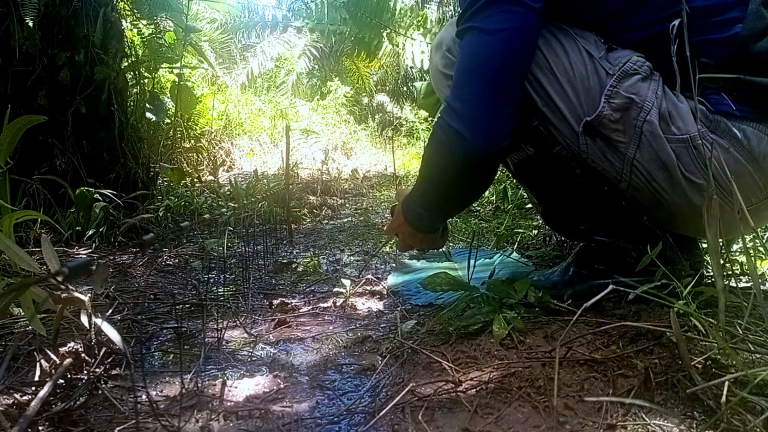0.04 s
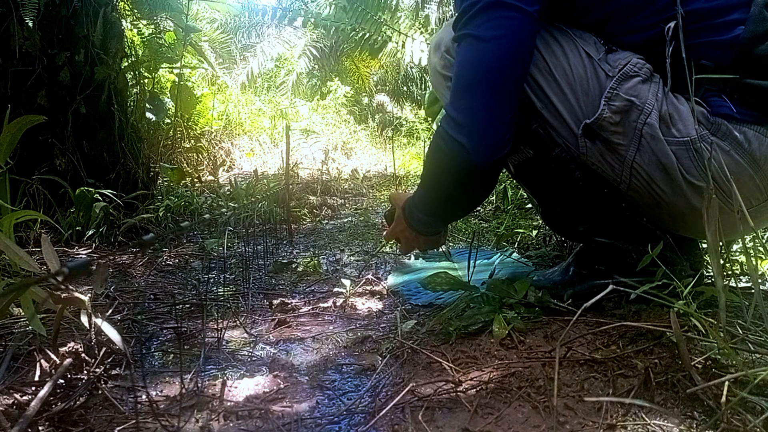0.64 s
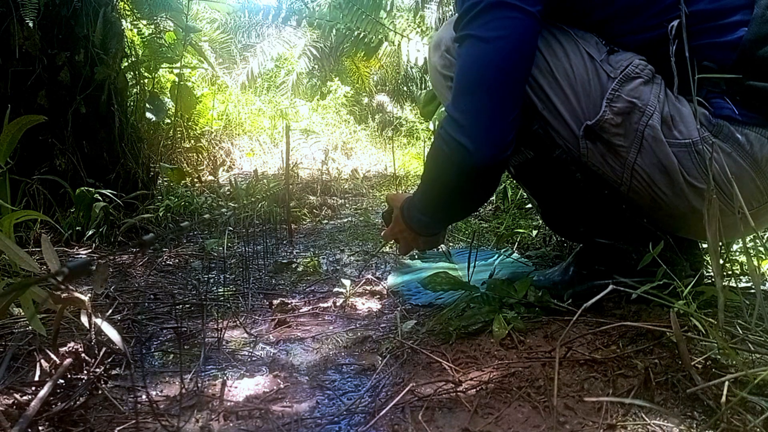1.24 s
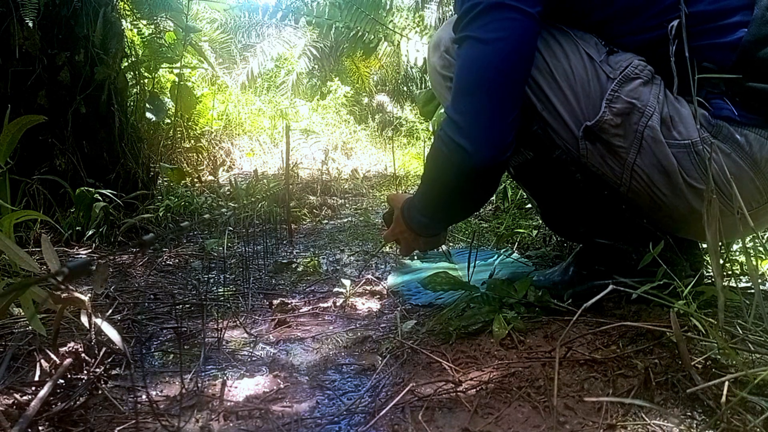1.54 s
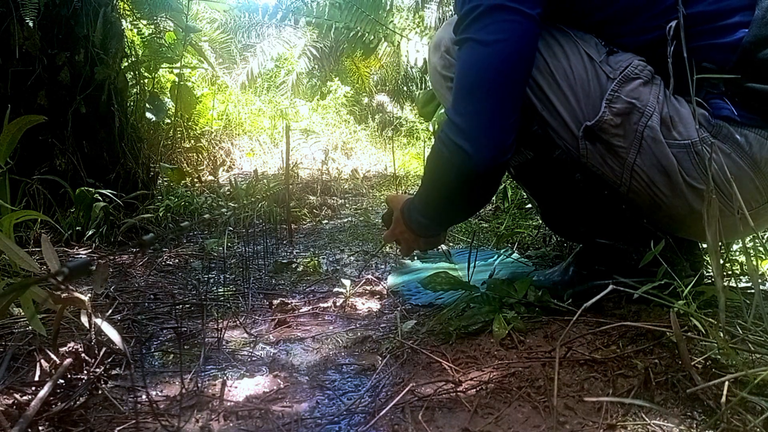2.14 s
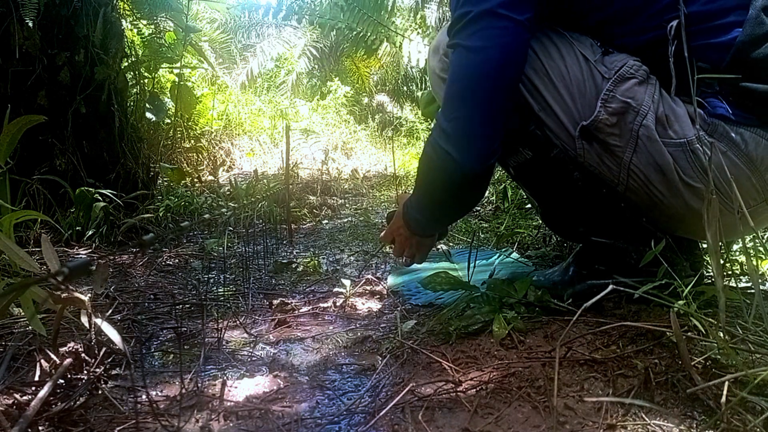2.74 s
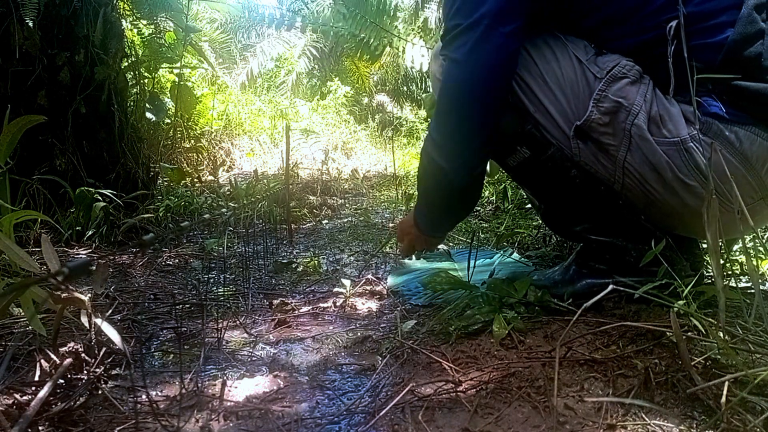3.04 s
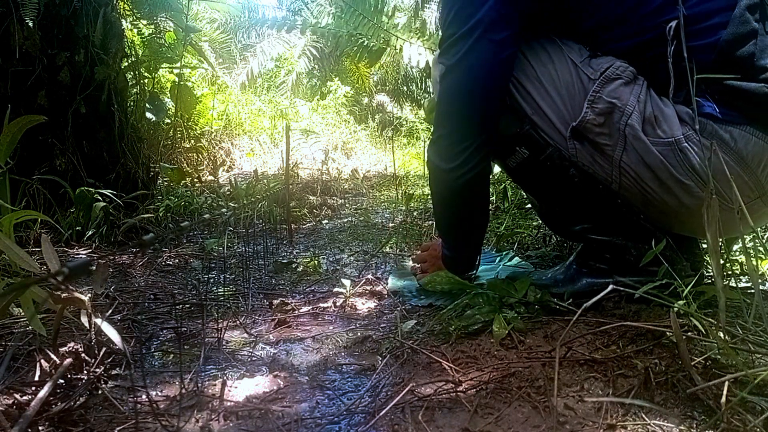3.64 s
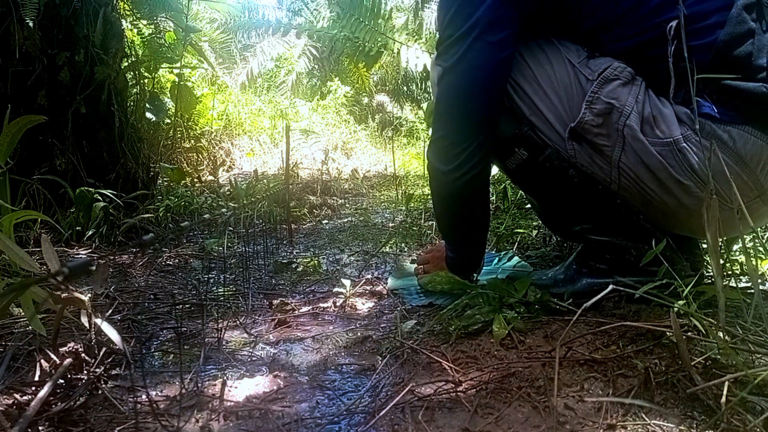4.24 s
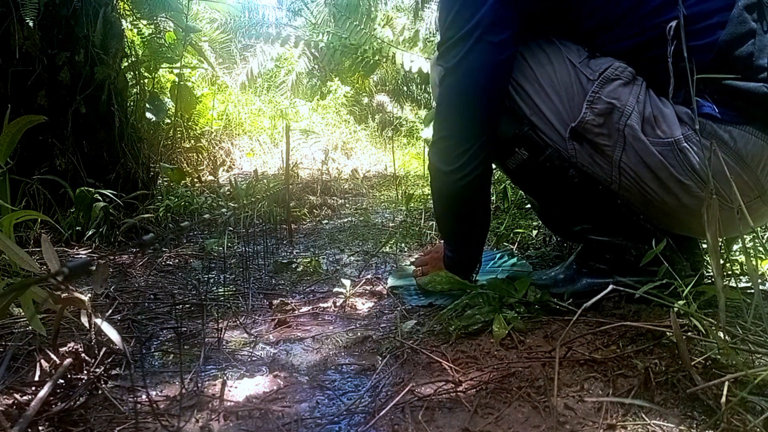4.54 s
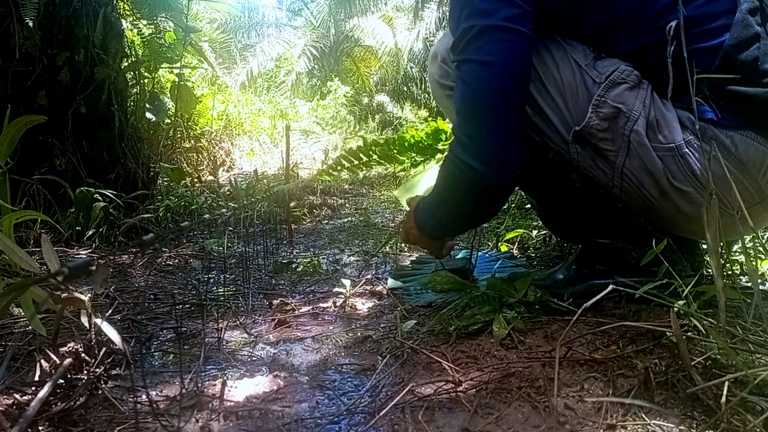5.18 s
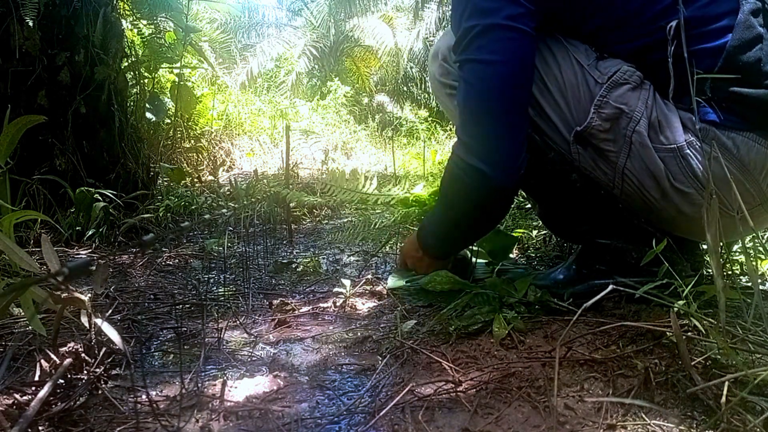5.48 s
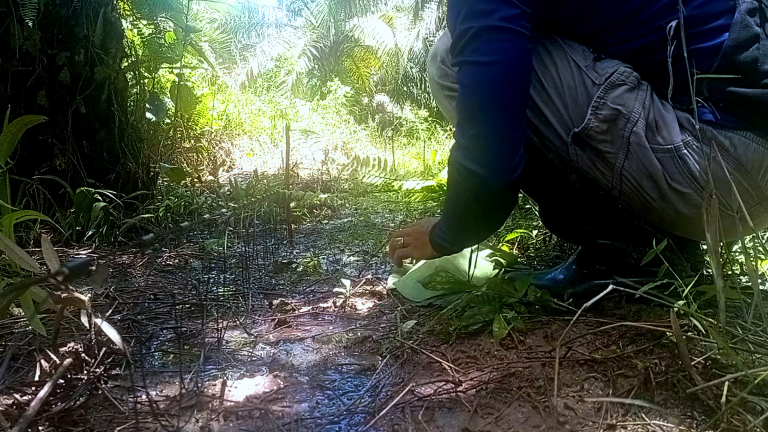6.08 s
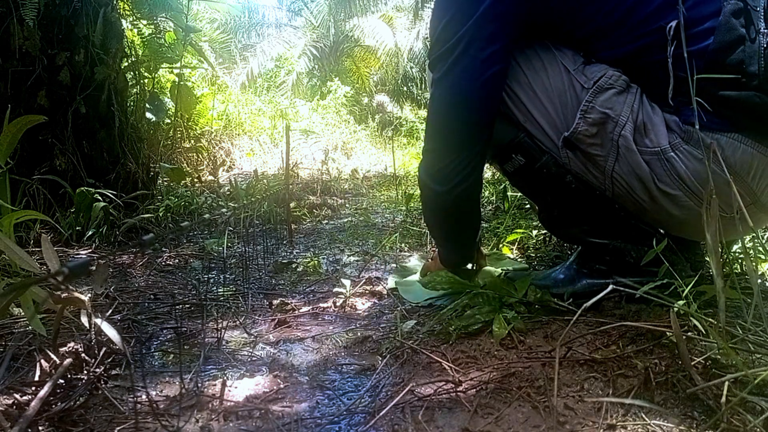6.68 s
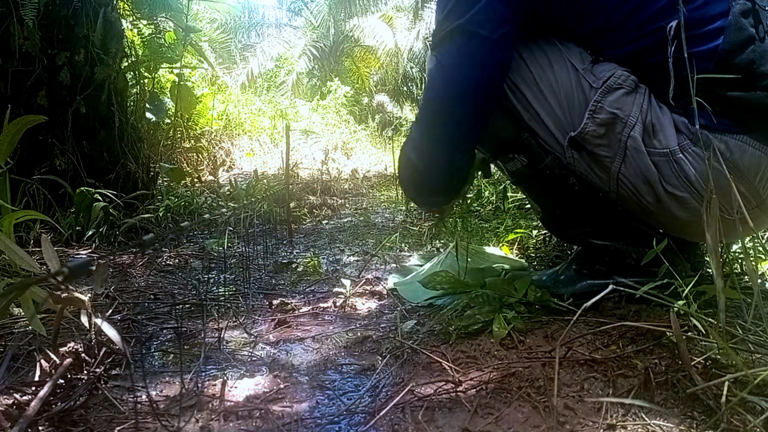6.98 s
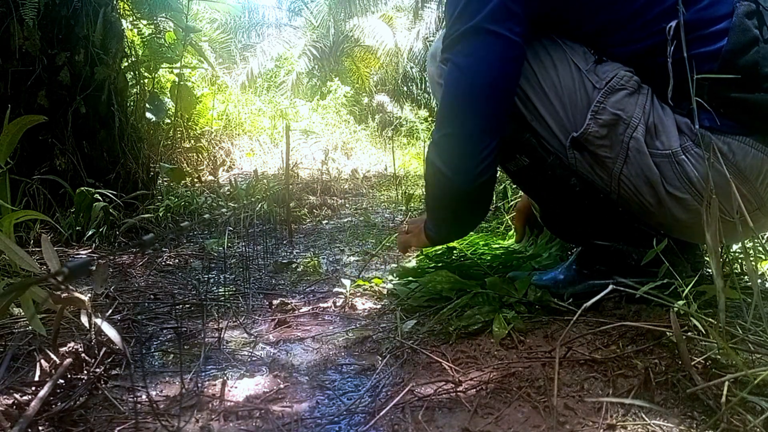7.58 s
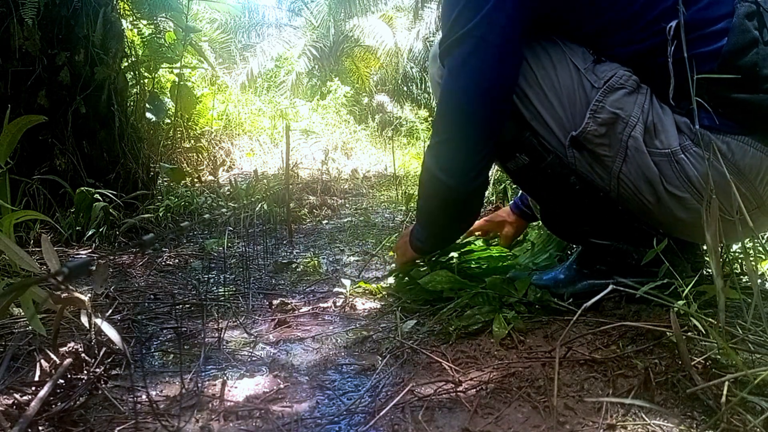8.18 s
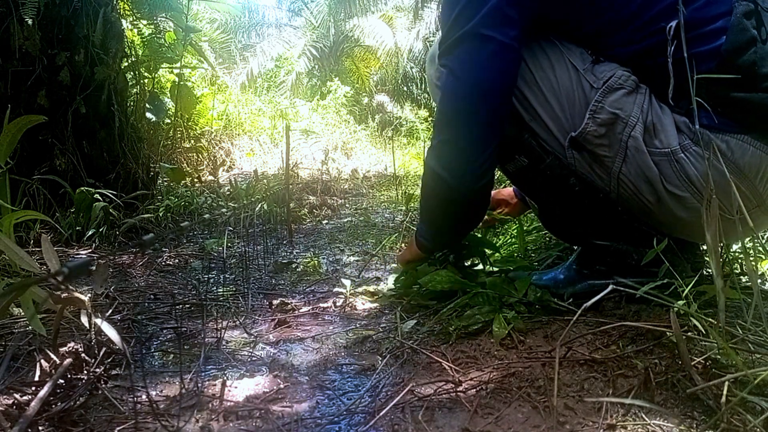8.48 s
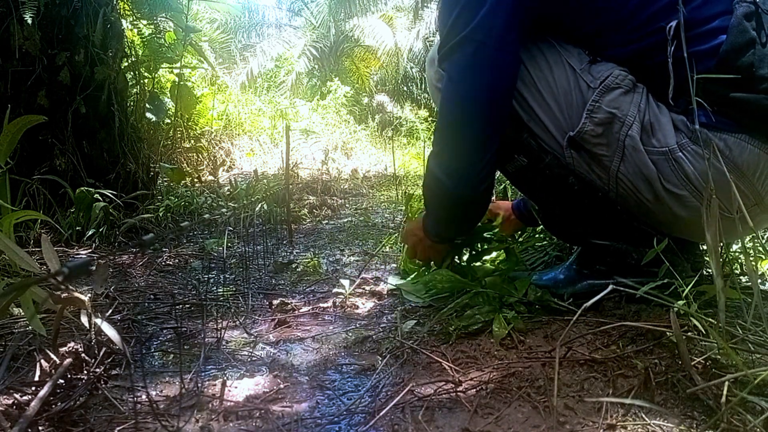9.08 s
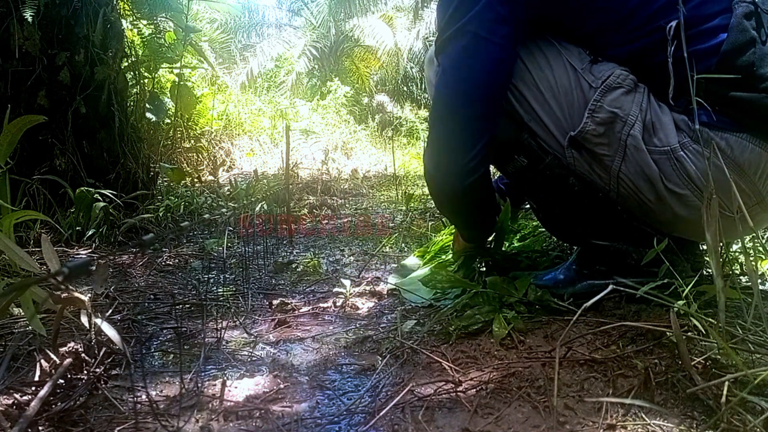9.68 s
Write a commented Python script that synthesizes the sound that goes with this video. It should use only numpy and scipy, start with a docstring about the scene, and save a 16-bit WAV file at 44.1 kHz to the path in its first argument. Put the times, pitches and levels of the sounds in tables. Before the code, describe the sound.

A waterhen calls about twice a second in a wet plantation, each croak breaking into a hoot, over a constant, shimmering cicada drone. Two light wooden taps and a faint distant bird are heard near the start. Someone near the microphone snaps six stems with bright cracks, shifts softly, then presses down rustling fronds in repeated strokes while the calling carries on almost to the end.

```python
"""A wet plantation, with cicadas droning without pause and the trunks echoing.
A waterhen calls nineteen times: the two voices of its syrinx beat in a hoarse croak, then leap
and lock an octave apart in a loud hoot. Far off, a second bird answers faintly.
Close to the microphone wood is tapped twice; someone crouching snaps a few stems, shifts,
and then spreads rustling leaves on the ground."""
import sys
import numpy as np
from scipy import signal
from scipy.fft import rfft, irfft, next_fast_len
from scipy.io import wavfile
from scipy.ndimage import uniform_filter1d, map_coordinates

SR = 44100
rng = np.random.default_rng(int(sys.argv[2]) if len(sys.argv) > 2 else 0)


def store_wav(level_fs):
    """Save 16-bit WAV to argv[1]."""
    pcm = np.round(np.clip(np.atleast_2d(level_fs), -1, 1) * 32767)
    wavfile.write(sys.argv[1], SR, pcm.T.astype(np.int16))


N = 433062

USUAL_NOTE_S, LEAP_AT_S = 0.11, 0.049  # a usual waterhen note, and the middle of its leap
# Spectrum of bending leaves: frequency_hz, gain_db
CRINKLE_SPECTRUM = [(2000, -33), (2700, -16.5), (3200, -10), (3800, -1), (4250, 4.5), (4800, -13),
                    (5600, -10), (6500, -27.5), (13000, -42.5)]


def amp(db):
    """Decibels to gain."""
    return 10 ** (np.asarray(db) / 20)


def unit(x):
    """Scale to rms 1."""
    return x / np.sqrt(np.mean(np.abs(x) ** 2) + 1e-20)


def along(points, hz):
    """Read (frequency_hz, value) points on a log frequency axis."""
    knots_hz, values = np.transpose(points)
    return np.interp(np.log(hz + 1), np.log(knots_hz + 1), values)


def curves(rows, t):
    """Each column after the time, read at the times t."""
    times, *columns = np.transpose(rows)
    return [np.interp(t, times, column) for column in columns]


def step(t, at, width):
    """A smooth rise from 0 to 1 around a moment."""
    return .5 + .5 * np.tanh((t - at) / (2 * width))


def bump(t, at, width):
    """A bell of height 1 around a moment."""
    return np.exp(-((t - at) / width) ** 2)


def gate(t, length, attack_s, release_db_per_s):
    """Rise, hold until length, then die away."""
    return np.clip(t / attack_s, 0, 1) * amp(-release_db_per_s * np.maximum(t - length, 0))


def wobble(rate, size=N):
    """A smooth random curve, rate knots a second."""
    knots = rng.standard_normal(int(size * rate / SR) + 4)
    return map_coordinates(knots, [np.arange(size) * rate / SR])


def coloured(x, spectrum):
    """Filter x by (frequency_hz, gain_db) points."""
    size = next_fast_len(len(x) + 8192)
    gain = amp(along(spectrum, np.fft.rfftfreq(size, 1 / SR)))
    return irfft(rfft(x, size) * gain, size)[:len(x)]


def noise(spectrum, size=N):
    """Coloured noise of rms 1."""
    return unit(coloured(rng.standard_normal(size), spectrum))


def add(track, start_s, sound):
    """Mix a sound into a track."""
    i = max(round(start_s * SR), 0)
    track[i:i + len(sound)] += sound[:len(track) - i]


def grove(x, wet_db, build_s=0.0015):
    """x with a fresh diffuse echo from the trunks."""
    # Decay among the trunks: frequency_hz, t60_s
    decay = [(200, 0.3), (600, 0.14), (1100, 0.35), (1700, 0.31), (2500, 0.13), (3400, 0.37), (4500, 0.26),
             (9000, 0.18)]
    hz, t, bands = signal.stft(rng.standard_normal(SR // 2), SR, nperseg=256)
    tail = signal.istft(bands * amp(-60 * t / along(decay, hz)[:, None]), SR, nperseg=256)[1]
    tail *= 1 - bump(np.arange(len(tail)) / SR, 0, build_s)
    echo = signal.fftconvolve(x, tail)
    return np.pad(x, (0, len(tail) - 1)) + amp(wet_db) * echo * np.linalg.norm(x) / np.linalg.norm(echo)


def air():
    """Faint moving air all around."""
    # Spectrum of the air: frequency_hz, gain_db
    spectrum = [(25, -15.5), (120, 4), (300, 0.5), (1000, -7.5), (2000, -15.5), (5000, -21), (9000, -6)]
    return amp(-81.5) * noise(spectrum)


def insects():
    """Many cicadas merge into a shimmering band, with thin crickets below it."""
    # Spectra of the cicadas' drone, their top sizzle and the crickets: frequency_hz, gain_db
    drone_spectrum = [(4500, -59.5), (6000, -39.5), (6530, -16), (6920, -5), (7350, 1), (7650, -2.5),
                      (7940, -6), (8290, -15.5), (9230, -40.5), (9600, -41), (12400, -77.5)]
    sizzle_spectrum = [(9500, -28.5), (9850, -6), (10200, -23.5), (11300, -44.5), (12500, -34),
                       (13700, -13.5), (14300, -3), (14900, 0), (15100, 7), (15450, 13), (15600, -44)]
    cricket_spectrum = [(4800, -16), (5100, 5), (5500, 15), (5900, 6), (6400, -42.5)]
    drone = amp(-41 + 0.14 * wobble(45) + 0.23 * wobble(13)) * noise(drone_spectrum)
    sizzle_db = np.interp(np.arange(N) / SR, [0, 6, 9.8], [-56.3, -60, -59.5])
    sizzle = amp(sizzle_db + 0.65 * wobble(140)) * noise(sizzle_spectrum)
    crickets = amp(-72 + 3.5 * wobble(15)) * noise(cricket_spectrum)
    return drone + sizzle + crickets


def taps():
    """Two light knocks ring dry wood, close by."""
    # Knocks: start_s, level_db
    knocks = [(0.231, -50.5), (.4565, -46)]
    # Modes of the wood: pitch_hz, gain_db, t60_s
    modes = [(944, 4, 0.029), (1093, -4, .03), (1820, 0, 0.027), (2230, -4.5, 0.082), (3300, -14, 0.057),
             (3750, -10, .03), (4230, 2, 0.026)]
    out = np.zeros(N)
    t = np.arange(SR // 8) / SR
    for start_s, level_db in knocks:
        ring = np.zeros(len(t))
        for hz, gain_db, t60 in modes:
            decay = amp(gain_db + rng.normal(0, 0.48) - 60 * t / t60)
            ring += decay * np.sin(2 * np.pi * hz * t + wobble(270, len(t)))
        attack = 1 - np.exp(-t / 0.0018)
        add(out, start_s, grove(amp(level_db) * ring * attack, wet_db=-19))
    return out


def far_bird():
    """Short wavering hoots from far off among the trunks."""
    # Answering hoots: start_s, length_s, pitch_hz, level_db
    hoots = [(0.944, 0.019, 1114, -46), (1, 0.12, 816, -67), (1.132, 0.047, 900, -52),
             (1.821, 0.028, 903, -53.5), (1.841, .04, 1026, -47), (2.391, 0.11, 903, -49),
             (3.287, 0.053, 923, -55)]
    out = np.zeros(N)
    t = np.arange(SR // 5) / SR
    for start_s, length, hz, level_db in hoots:
        tone = np.sin(2 * np.pi * hz * t + 0.64 * wobble(180, len(t)))
        arch = np.sin(np.pi * np.minimum(t / length, 1))
        add(out, start_s, grove(amp(level_db) * tone * arch, wet_db=-7))
    return out


def low_voice(age):
    """The syrinx's second voice: its pitch over the main pitch, its gain and its sidebands' gain."""
    croak_ratio, hoot_ratio, attack_s = .32, .5, 0.0042
    ratio = croak_ratio + (hoot_ratio - croak_ratio) * step(age, .03, .005)
    # It swells in the croak and again at the break, over a floor that dies in the hoot.
    gain = amp(-8.5) * bump(age, 0.017, .009) + amp(-8) * bump(age, 0.047, 0.0074)
    gain += amp(-26) * gate(age, LEAP_AT_S, attack_s, release_db_per_s=598)
    # The sidebands flare as the leap ends and stay weaker afterwards.
    flare = amp(-10.5) * bump(age, LEAP_AT_S + 0.0058, 0.0064)
    sidebands = amp(-19.5 - 10.5 * step(age, LEAP_AT_S, 0.0043)) + flare
    return ratio, gain, sidebands * np.minimum(age / attack_s, 1)


def near_reflection(held, sounding, strength=0.77, beat_hz=52):
    """Complex gain: a reflection slightly off the gliding pitch beats nulls into the held hoot."""
    size = len(held)
    slip = 2 * np.pi * np.cumsum(held * beat_hz * np.exp(.35 * wobble(40, size))) / SR
    depth = np.clip(strength + 0.19 * wobble(31, size), 0, 1.3) * held
    gain = 1 + depth * np.exp(1j * slip * rng.choice([-1, 1]))
    gain /= (1 + np.abs(gain) ** 4) ** (1 / 4)  # flatten the peaks
    return gain / np.sqrt(np.mean(np.abs(gain[sounding]) ** 2))


def beak_rasp(t, main_phase, low_phase, croak, held):
    """Overtones of the main voice, plus beak resonances rung by uneven pulses of the low voice."""
    # Overtones: pitch_multiple, croak_db, hoot_db
    overtones = [(2, -28, -34.5), (2.5, -65, -34.5), (3, -76, -35), (4, -56, -31), (4.5, -53, -34.5)]
    # Beak resonances: centre_hz, width_hz, croak_db, hoot_db
    resonances = [(3536, 220, -73.5, -33.5), (4420, 220, -20, -38)]
    size = len(t)
    rasp = np.zeros(size)
    for multiple, croak_db, hoot_db in overtones:
        gain = (amp(croak_db) * croak + amp(hoot_db) * held) * amp(4.5 * wobble(90, size))
        rasp += gain * np.sin(multiple * main_phase + 0.39 * wobble(150, size))
    pulses = 1 + .5 * np.cos(low_phase)
    for centre_hz, width_hz, croak_db, hoot_db in resonances:
        drive = pulses * (wobble(width_hz, size) + 1j * wobble(width_hz, size)) / np.sqrt(2)
        hz = centre_hz * (1 + 0.017 * rng.standard_normal())  # the beak opens differently each note
        ring = np.real(drive * np.exp(2j * np.pi * hz * t))
        rasp += amp(croak_db + (hoot_db - croak_db) * held) * ring * (1 - np.exp(-t / .008))
    return rasp


def note(length, croak_hz, croak_db, hoot_hz, hoot_db, hoarse_db):
    """Two voices of the syrinx beat hoarsely, then lock an octave apart in the hoot."""
    # The throat, which cuts deep bass and rings at the upper sideband: frequency_hz, gain_db
    throat = [(120, -46.5), (180, -15.5), (240, -1.5), (1300, 1.5), (1560, 5.5), (1800, -8.5), (2100, -15),
              (3000, -27.5)]
    # Colour of the beak: frequency_hz, gain_db
    beak = [(1500, 2.5), (1800, -0.5), (2080, -4), (2300, -12), (2550, 4), (2800, -15), (3500, -4),
            (3950, -28.5), (4400, 1), (5100, -10.5), (6000, -22.5)]
    overshoot, settle_s, sag_hz_per_s = .09, .014, 220
    croak_jitter, hoot_jitter = 0.038, 0.009
    size = SR // 4
    t = np.arange(size) / SR
    age = t * np.sqrt(USUAL_NOTE_S / length)  # a longer note unfolds more slowly
    leap = step(age, LEAP_AT_S, 0.0043) * (1 + overshoot * bump(age, LEAP_AT_S + settle_s, settle_s))
    croak = 1 - np.clip(leap, 0, 1)
    held = np.clip((age - .058) / .016, 0, 1)

    hz = croak_hz + (hoot_hz - croak_hz) * leap - sag_hz_per_s * np.maximum(age - LEAP_AT_S, 0)
    hz *= 1 + (hoot_jitter + (croak_jitter - hoot_jitter) * croak) * wobble(170, size)
    ratio, low_gain, sideband_gain = low_voice(age)
    main_phase = 2 * np.pi * np.cumsum(hz) / SR
    low_phase = 2 * np.pi * np.cumsum(hz * ratio * (1 + 0.099 * croak * wobble(200, size))) / SR
    tone = np.real(near_reflection(held, t < length) * np.exp(1j * main_phase))
    tone *= amp(2.2 * croak * wobble(260, size))  # the croak flutters
    sidebands = np.sin(main_phase + low_phase) + 0.39 * croak * np.sin(main_phase - low_phase)
    sidebands *= sideband_gain * amp(0.36 * hoarse_db + 0.67 * wobble(150, size))
    hoarse = low_gain * amp(hoarse_db) * np.sin(low_phase) + sidebands
    rasp = amp(0.77 + 1.29 * hoarse_db) * beak_rasp(t, main_phase, low_phase, croak, held)

    # A burst opens the note, the voice weakens as it leaps, then the hoot bursts out.
    effort_db = 10.5 * np.exp(-age / 0.0027) - 4.5 * bump(age, 0.047, 0.0038)
    level_db = croak_db + (hoot_db - croak_db) * step(age, 0.056, 0.0014)
    release_db = 450 * np.maximum(t - length + 0.01, 0)
    attack = 1 - bump(t, 0, .0017)
    envelope = np.sqrt(2) * amp(level_db + effort_db - release_db) * attack
    voice = grove(coloured(envelope * (tone + hoarse), throat), wet_db=-16)
    return voice + grove(coloured(envelope * rasp, beak), wet_db=-0.5)


def waterhen():
    """The nearer bird's string of notes: a hoarser note is also longer and raspier."""
    # Notes: start_s, hoot_db, hoarseness_db
    notes = [(1.168, -23, .5), (1.591, -23, 1), (2.027, -24, -1.5), (2.449, -22, 0), (2.898, -22.5, -4),
             (3.325, -27, 0.5), (3.749, -26, 3.5), (4.176, -24.5, 4), (4.601, -25, 4), (5.027, -24.5, 4),
             (5.46, -26, 4.5), (5.914, -24, 1), (6.344, -23, 1), (6.782, -20.5, -2.5), (7.235, -22.5, -5.5),
             (7.684, -21, -2.5), (8.124, -21, -5.5), (8.576, -21.5, -11), (9.047, -26, -28.5)]
    # The voice, sinking as the bird tires: time_s, croak_hz, croak_db, hoot_hz
    bout = [(1.2, 855.4, -32, 1136), (5.7, 842.2, -37, 1128), (6.8, 836.6, -31.5, 1131),
            (8.12, 819, -34, 1108), (8.58, 757, -34.5, 1121), (9.05, 718, -40.5, 1115)]
    out = np.zeros(N)
    for start_s, hoot_db, hoarse_db in notes:
        croak_hz, croak_db, hoot_hz = curves(bout, start_s)
        length = USUAL_NOTE_S + .0008 * hoarse_db
        add(out, start_s, note(length, croak_hz, croak_db, hoot_hz, hoot_db, hoarse_db))
    return out


def snaps():
    """Stems break near the microphone with a bright crack over a duller body."""
    # Breaking stems: time_s, level_db, body_relative_db, t60_s
    breaks = [(1.394, -35, -22.5, 0.075), (2.59, -37, -19, 0.066), (3.851, -34, -12, 0.057),
              (4.497, -29.5, -17.5, 0.052), (5.648, -25.5, -29, 0.038), (6.916, -27, -12.5, 0.029)]
    # Spectra of the crack and of the body: frequency_hz, gain_db
    crack_spectrum = [(500, -67), (1300, -23), (1700, -16), (2080, -5), (2550, -8.5), (3200, -14.5),
                      (3650, -11.5), (4000, -3.5), (4350, 8.5), (4750, -7), (5400, -9.5), (6200, -17),
                      (9500, -73)]
    body_spectrum = [(150, -49.5), (350, -21), (500, 10), (700, -14), (1000, 1.5), (1400, -1), (2200, -31)]
    out = np.zeros(N)
    t = np.arange(SR // 4) / SR
    for time_s, level_db, body_db, t60 in breaks:
        snap = noise(crack_spectrum, len(t)) + amp(body_db) * noise(body_spectrum, len(t))
        envelope = amp(level_db + 2 - 60 * t / t60) * (1 - bump(t, 0, 0.0035))
        add(out, time_s - .002, grove(envelope * snap, wet_db=2))
    return out


def rustle(spectrum, contacts_per_s, spread_db, patchy_db=5):
    """Many tiny leaf contacts of uneven size, each leaf with its own colour; rms 1."""
    hits = rng.random(N) < contacts_per_s / SR
    contacts = hits * rng.standard_normal(N) * amp(spread_db * wobble(60))
    bands = signal.stft(contacts, nperseg=512)[2]
    patches = uniform_filter1d(rng.standard_normal(bands.shape), 3, axis=0)
    patches = unit(uniform_filter1d(patches, 10, axis=1))
    patchy = signal.istft(bands * amp(patchy_db * patches), nperseg=512)[1][:N]
    return unit(coloured(patchy, spectrum))


def stirring():
    """The crouching person shifts, touching leaves and clothes and swelling a constant low rumble."""
    # Shifts of the body: start_s, length_s, rustle_db, rumble_db
    shifts = [(3.878, 0.13, -87.5, -79), (4.656, .35, -61.5, -91.5), (5.014, 0.59, -66, -77.5)]
    # Floor of the rumble: time_s, level_db
    rumble_floor = [(0, -87.5), (3.5, -88), (7, -84)]
    # Spectrum of the rumble: frequency_hz, gain_db
    rumble_spectrum = [(25, -23), (50, -9.5), (90, 3), (130, 1.5), (200, -15), (400, -16), (1500, -47.5)]
    t = np.arange(N) / SR
    touch_gain, rumble_gain = np.zeros(N), amp(curves(rumble_floor, t)[0])
    for start_s, length, rustle_db, rumble_db in shifts:
        move = gate(t - start_s, length, attack_s=0.042, release_db_per_s=30)
        touch_gain += amp(rustle_db) * move
        rumble_gain += amp(rumble_db) * move
    touches = touch_gain * rustle(CRINKLE_SPECTRUM, contacts_per_s=4600, spread_db=4)
    return touches + rumble_gain * amp(1.5 * wobble(6.2)) * noise(rumble_spectrum)


def leaves():
    """Close by, fronds crinkle most when first bent and brush as the hand presses them down."""
    # Strokes of the hand: start_s, length_s, hardest_after_s, brush_db, crinkle_db
    strokes = [(6.133, 0.24, 0.075, -68.5, -69.5), (6.347, 0.22, .08, -64, -66),
               (6.534, 0.072, 0.069, -57.5, -49.5), (6.662, 0.24, 0.15, -51, -51),
               (6.964, .25, 0.16, -55, -50), (7.292, 0.41, 0.33, -48, -48.5),
               (7.869, 0.32, 0.3, -49.5, -54), (8.277, 0.44, 0.28, -49.5, -52),
               (8.87, 0.58, 0.18, -49, -51), (9.458, .4, 0.22, -47.5, -50.5)]
    # Spectrum of brushed fronds: frequency_hz, gain_db
    brush_spectrum = [(150, -45.5), (300, -30), (480, -8.5), (600, -16.5), (780, -14.5), (1000, 4.5),
                      (1300, -20), (1600, -1.5), (1900, -17), (2330, -18.5), (2750, 8.5), (3060, -13),
                      (3400, -9), (4400, -44)]
    press_db_per_s, ease_db_per_s = 31, 34
    bent_s, rise_db_per_s, fall_db_per_s = 0.11, 49, 31  # the crinkle's peak and slopes
    brush, crinkle = np.zeros(N), np.zeros(N)
    t = np.arange(SR) / SR
    for start_s, length, hardest_s, brush_db, crinkle_db in strokes:
        touch = gate(t, length, attack_s=0.024, release_db_per_s=199.5)
        pressure_db = -np.maximum(press_db_per_s * (hardest_s - t), ease_db_per_s * (t - hardest_s))
        bend_db = -np.maximum(rise_db_per_s * (bent_s - t), fall_db_per_s * (t - bent_s))
        add(brush, start_s, touch * amp(brush_db + pressure_db))
        add(crinkle, start_s, touch * amp(crinkle_db + bend_db))
    brush *= amp(3) * rustle(brush_spectrum, contacts_per_s=5000, spread_db=-2.5)
    crinkle *= amp(1) * rustle(CRINKLE_SPECTRUM, contacts_per_s=7400, spread_db=-2)
    return brush + crinkle


def scene():
    """Birds, close handling, insects and air at one microphone."""
    return (waterhen() + far_bird() + taps() + snaps() + leaves() + stirring() + insects() + air())[None]


def record(dry):
    """The recorder keeps nothing above its band limit."""
    top_hz = 15600
    size = next_fast_len(N + 8192)
    passband = np.fft.rfftfreq(size, 1 / SR) < top_hz
    return irfft(rfft(dry, size) * passband, size)[:, :N]


dry = scene()
out = record(dry)
store_wav(out)
```